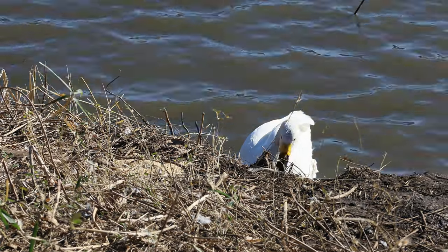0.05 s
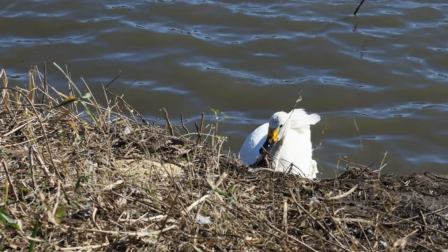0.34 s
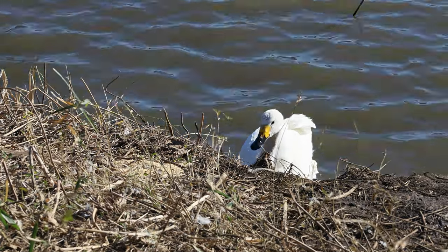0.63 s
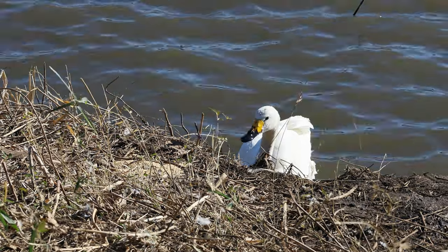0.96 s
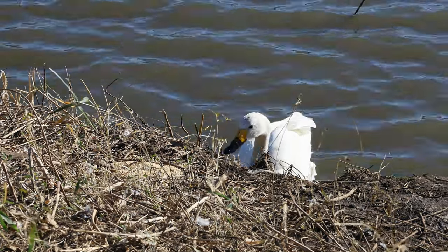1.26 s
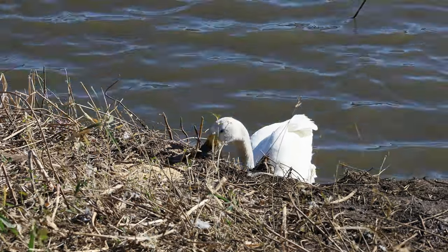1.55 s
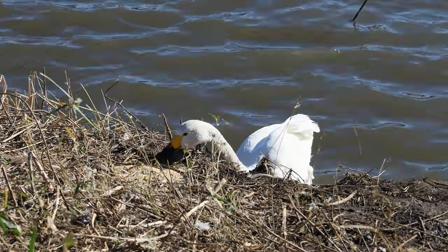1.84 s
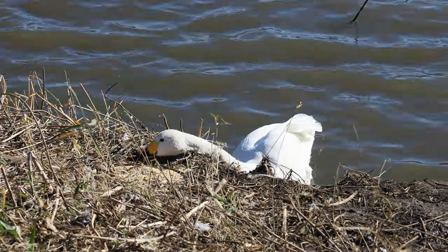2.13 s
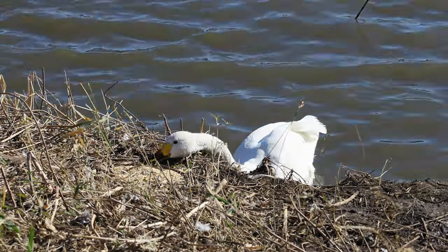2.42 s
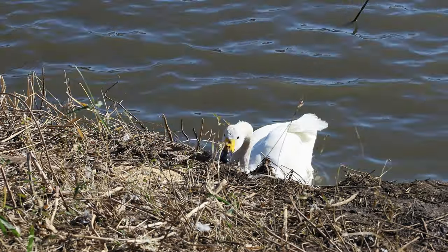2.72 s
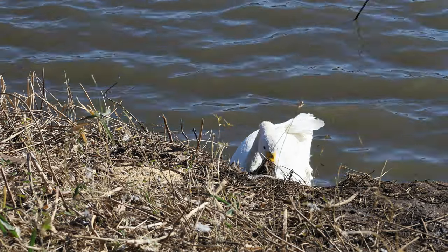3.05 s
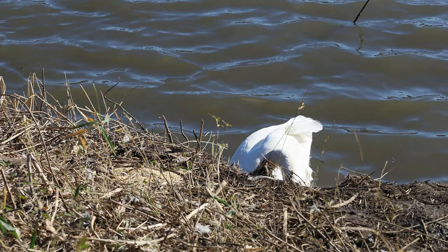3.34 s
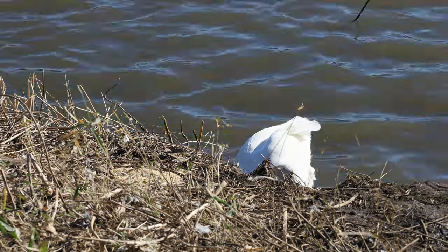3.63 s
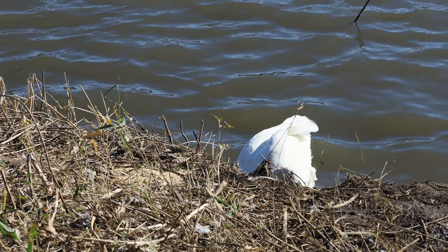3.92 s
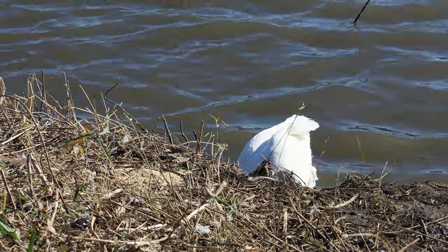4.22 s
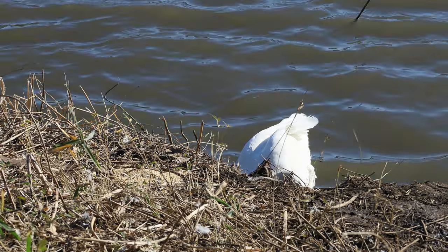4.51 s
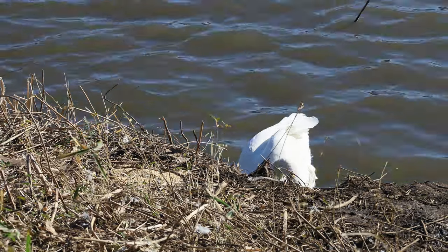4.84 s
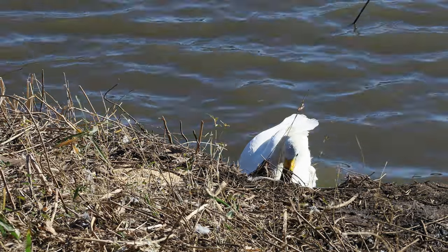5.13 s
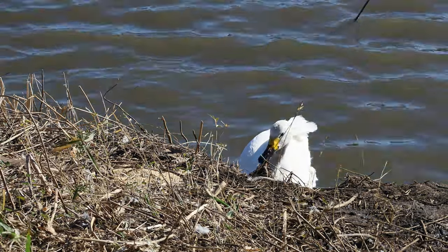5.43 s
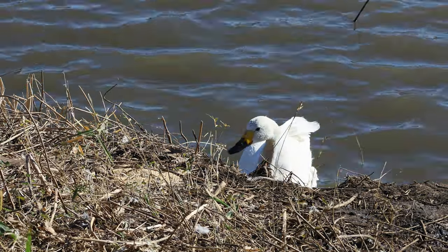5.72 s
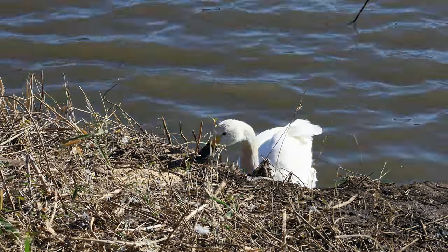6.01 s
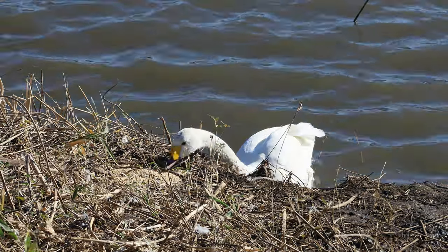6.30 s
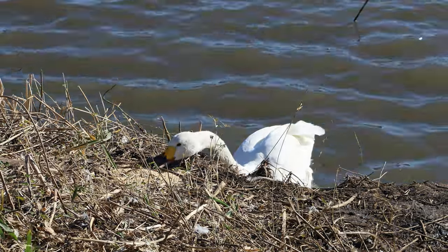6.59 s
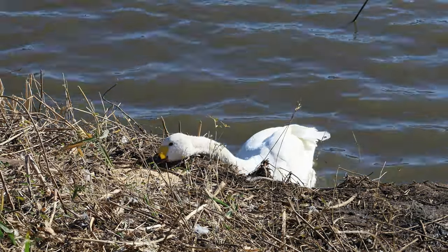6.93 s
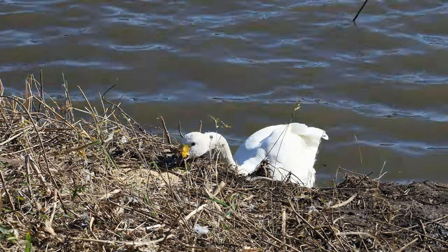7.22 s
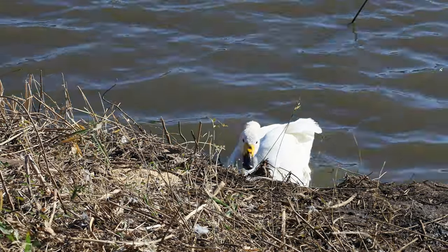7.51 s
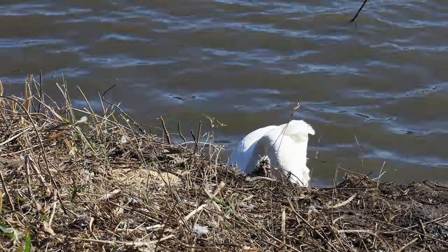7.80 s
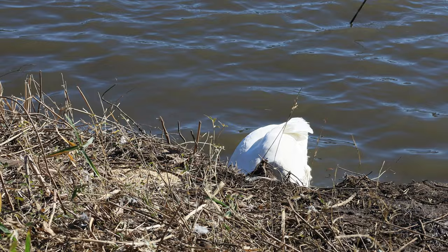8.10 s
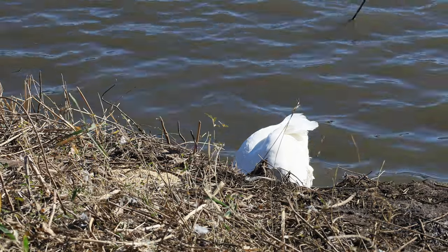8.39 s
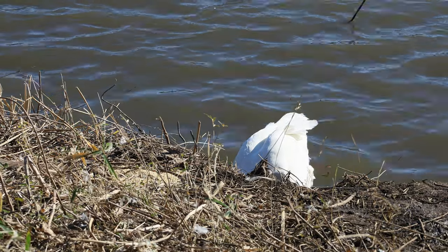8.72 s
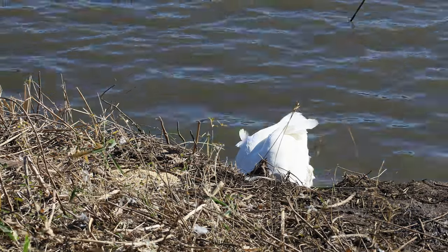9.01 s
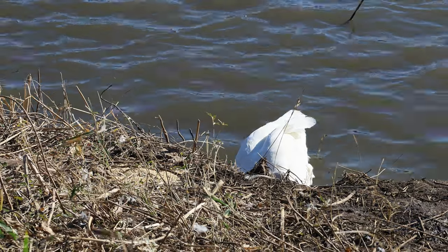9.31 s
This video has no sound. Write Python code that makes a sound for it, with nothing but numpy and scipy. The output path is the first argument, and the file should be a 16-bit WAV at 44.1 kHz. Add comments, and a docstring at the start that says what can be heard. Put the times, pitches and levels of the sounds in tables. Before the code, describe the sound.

A flock of swans calls throughout, for about nine seconds, on an open pond. Short arched honks, higher bugles and clear whoops overlap at several calls a second, with a light echo from the banks. Behind them a distant flock keeps up a softer chatter of honks and higher yelps. A few very brief reedy grunts are mixed in, with faint hoarse cries near 1.7 seconds and thin squeals at the start and around 3 to 4 seconds. The strongest calls come at about 0.6, 6.1, 8 and 8.9 seconds. Dry reeds rustle faintly, with scattered small snaps, the clearest near 8.8 seconds. Two tiny, barely audible splashes fizz at about 2.5 and 9 seconds. Low wind rumble on the microphone is slight at first, rises by 3 seconds and is strongest from 7 seconds on, staying beneath the calls.

```python
"""Whooper swans on a breezy pond

A flock calls in overlapping honks, bugles and whoops: membranes in each syrinx vibrate, and the windpipe
and bill resonate. More swans call from far off, and the banks return a soft echo. Near by, dry reeds
rustle and snap and water splashes softly, while a freshening wind rumbles on the microphone."""
import sys
import numpy as np
from scipy import signal
from scipy.fft import rfft, irfft
from scipy.io import wavfile
from scipy.ndimage import uniform_filter1d

SR = 44100
rng = np.random.default_rng(int(sys.argv[2]) if len(sys.argv) > 2 else 0)


def unload_wav(signal):
    """Save mono or channel-first audio to the path in sys.argv[1] as 16-bit WAV at rate SR, clipped to [-1, 1]."""
    wavfile.write(
        sys.argv[1],
        SR,
        np.round(np.clip(np.atleast_2d(signal).T, -1, 1) * 32767).astype(np.int16),
    )


N = 412335

# Pitches and levels of calls are nominal, before call() shapes them; octave and ring are relative levels.
# arched honks and low hoots: t/s, length/s, crest f/Hz, level/dB, octave/dB, overtone slope/dB
HONKS = [(0, 0.45, 576.6, -41.5, -20, -5), (0.341, 0.17, 799, -30, -26.5, -9.5),
         (0.556, .18, 755, -30, -19, -4.5), (0.819, 0.22, 607, -36.5, -42, -20),
         (1.421, 0.28, 785, -38.5, -12.5, -13.5), (1.5, 0.18, 643, -37.5, -24, -5),
         (1.698, 0.21, 813, -38, -21, -5), (1.783, 0.17, 859, -35, -29, -3),
         (2.371, 0.21, 794, -34.5, -28, -7), (2.549, 0.23, 819, -31.5, -27, -8),
         (2.858, 0.13, 709, -28.5, -24, -7), (3.155, 0.2, 790.6, -30, -36, -2),
         (3.218, 0.3, 762, -33.5, -33, -3), (3.45, 0.61, 506, -49.5, -28, -13),
         (3.737, 0.14, 750, -42.5, -30, -14), (4.312, 0.16, 762, -31.5, -17, -7.5),
         (4.323, 0.15, 700, -39, -24, -1.5), (4.791, 0.13, 786, -31, -25, -5.5),
         (5.04, 0.43, 534, -44.5, -37, -13), (5.205, 0.23, 767, -34, -21.5, -7),
         (5.318, 0.21, 801, -31.5, -36, 0), (5.578, 0.15, 748, -34, -21.5, -3.5),
         (6.217, 0.061, 510, -33.5, -26, -16), (6.269, 0.13, 686, -38, -26, -16),
         (6.734, 0.25, 784, -29, -28, -5.5), (6.991, 0.08, 674, -39, -39, -16),
         (7.184, 0.14, 769.4, -31, -20, -25), (7.634, 0.32, 732, -40, -31, -12),
         (7.976, 0.23, 780.5, -28, -28, -7.5), (7.984, 0.21, 810, -33, -23, -24),
         (8.163, 0.18, 601, -38, -36, -15), (8.559, .15, 787, -32.5, -25, -16),
         (8.657, 0.24, 719, -35, -24, -19), (9.141, 0.19, 718, -38, -23, -16)]
# ringing honks: t/s, length/s, crest f/Hz, level/dB, octave/dB, overtone slope/dB, ring/dB
YODELS = [(0.168, 0.2, 899, -33.5, -22.5, -9, -37), (1.064, 0.14, 901, -29.5, -28, -3, -41.5),
          (5.094, 0.15, 893, -30, -27, -9, -52), (6.118, 0.12, 879, -25.5, -27, -17, -56),
          (7.832, .18, 900, -24, -29, -18, -33.5), (8.693, 0.18, 905, -27, -26.5, -5.5, -42)]
# calls that crest early and sag: t/s, length/s, crest f/Hz, level/dB, octave/dB
BUGLES = [(0.679, 0.1, 1005, -35, -25), (1.223, 0.17, 1051, -41.5, -15), (1.316, 0.19, 992, -30.5, -26.5),
          (2.311, 0.18, 988, -30, -23), (2.76, 0.18, 859, -32.5, -39), (3.865, 0.21, 794, -45.5, -8.5),
          (4.13, 0.16, 863, -41, -34), (4.533, .16, 959, -35.5, -38), (4.883, 0.17, 830, -39.5, -12),
          (5.336, 0.15, 1006, -33.5, -15.5), (5.84, 0.122, 835, -52.5, -4.5),
          (5.973, 0.16, 858, -31.5, -28), (6.478, 0.19, 977, -32.5, -20), (6.577, .18, 927, -35.5, -24),
          (7.098, 0.188, 844, -35, -16), (7.43, 0.2, 982, -29, -20.5), (7.79, 0.1, 1052, -33.5, -21),
          (8.18, 0.13, 1230, -42.5, -33), (8.45, 0.093, 1075, -36.5, -24), (8.533, 0.14, 933, -36.5, -26),
          (8.93, 0.14, 1057, -35, -20.5)]
# calls that flip up to a sharp crest and back: t/s, length/s, crest f/Hz, level/dB
WHOOPS = [(-.06, .17, 930, -28), (0.556, 0.16, 909, -25), (0.632, 0.22, 964, -30.5),
          (1.036, 0.2, 1024, -34.5), (1.322, 0.2, 953, -29), (2.2, .16, 904, -29),
          (2.565, 0.2, 893.5, -28.5), (2.891, 0.2, 874, -29.5), (3.582, .17, 916, -28.5),
          (4.518, 0.17, 1024, -28), (4.764, 0.24, 882, -35), (5.377, 0.17, 938, -28),
          (6.143, .15, 946, -29), (7.163, 0.175, 944, -30.5), (7.949, 0.13, 950, -25),
          (8.847, .14, 963, -25.5)]
# reedy low grunts: t/s, length/s, top f/Hz, fundamental level/dB, second harmonic level/dB
GRUNTS = [(0.175, 0.034, 796, -27, -62), (2.206, 0.033, 725, -44, -52), (2.582, .05, 794, -33, -53),
          (3.142, 0.0214, 665, -38.5, -46), (5.063, 0.051, 680, -35, -49), (6.083, 0.043, 660, -34, -46.5)]
# thin high calls: t/s, rise/s, fall/s, start f/Hz, crest f/Hz, end f/Hz, level/dB, octave/dB
SQUEALS = [(-.01, 0.12, 0.098, 1740, 2046, 1455, -45.5, -10.5),
           (2.792, 0.11, 0.013, 1158, 1157, 1170, -43, -22),
           (3.772, 0.051, 0.013, 1480, 1610, 1590, -52, -25),
           (3.936, 0.054, .012, 1108, 1210, 1205, -44, -26),
           (4.06, 0.057, 0.038, 1383, 1487, 1470, -46.5, -22),
           (3.772, 0.056, 0.013, 1470, 1610, 1590, -56, -24),
           (3.935, 0.058, .012, 1098, 1232, 1205, -43.5, -26)]
# hoarse falling calls: t/s, rise/s, fall/s, start f/Hz, crest f/Hz, end f/Hz, level/dB, octave/dB
SQUAWKS = [(1.715, 0.05, 0.11, 1347, 1630, 1380, -46, -13),
           (1.752, 0.0225, 0.092, 1350, 1387, 1240, -45, -17)]
# bouts in which the far birds yelp: start t/s, end t/s
YELP_BOUTS = [(0.2, 1.585), (2.5, 3.58), (3.8, 5.7), (8.3, 11.8)]
# stirring of the reeds: t/s, level/dB
REED_LEVELS = [(0, -64), (0.55, -65.5), (1.75, -60), (2.35, -60), (2.62, -56), (2.88, -58), (3.2, -57),
               (4.05, -58.5), (4.4, -63.5), (4.85, -58), (5.8, -62.5), (7.35, -60), (8.4, -59.5),
               (9.15, -55.5)]
# spectrum of the rustle: f/Hz, relative level/dB
REED_SPECTRUM = [(300, 6), (2000, 4.5), (4500, 3), (9000, 0), (13500, 0), (16000, -4)]
# dry stalks that snap: t/s, peak level/dB, centre f/Hz
STALK_SNAPS = [(0.183, -43, 6000), (0.358, -46.5, 5970), (0.955, -46, 10000), (2.403, -42, 12000),
               (2.575, -46, 11000), (2.7407, -40, 10500), (3.1847, -42, 9450), (3.204, -43, 8000),
               (3.6461, -43, 9000), (3.676, -43, 11100), (4.0482, -40, 11500), (6.4825, -48, 7950),
               (6.8647, -42.5, 8000), (7.2394, -45, 10100), (7.474, -43, 9050), (8.6697, -44, 11200),
               (8.83, -40, 11000), (8.848, -35.5, 3580), (9.0823, -44, 12000)]
# small splashes: t/s, length/s, level/dB
SPLASHES = [(2.55, .2, -61), (9.06, .22, -60)]
# wind on the microphone: t/s, level/dB
WIND_LEVELS = [(0, -64.5), (0.8, -58), (1.6, -54.5), (2.9, -43), (4.85, -43), (5.1, -38), (6.2, -43),
               (7.2, -38.5), (8.3, -36.5), (9.35, -37)]
# spectrum of the buffeting: f/Hz, relative level/dB
WIND_SPECTRUM = [(15, -5.5), (55, -0.5), (140, -5.5), (300, -16), (900, -27.5)]
# spectrum of the hush of open country: f/Hz, relative level/dB
AIR_SPECTRUM = [(30, -17), (330, -6), (1500, -14.5), (4000, -31.5)]

REST_HZ = 512  # pitch of the slack syrinx
SCOOP, SCOOP_S = 0.0442, 0.01676  # a call starts flat by this share and settles this fast
BREAK, BREAK_S = .022, .004  # largest share by which the voice breaks downward, and how fast
HOLD_HZ, HOLD_WIDTH_HZ = 688.6, 88.4  # the windpipe holds the pitch near here, then lets it leap
PIPE_SPACING_HZ, PIPE_RIPPLE_DB = 570, 2.6  # upper resonances of the windpipe
BILL_HZ, BILL_WIDTH_HZ, ROLLOFF_HZ = 2080, 560, 5500
RING_HZ, RING_WIDTH_HZ = 5130, 1060  # bright resonance of the bill
ATTACK_S, RELEASE_S, ONSET_EFFORT = 0.0092, 0.027, 0.54
WAVER, FLUTTER_DB = .006, 1.1  # unsteadiness of pitch (a share) and of level


def call(row, bend, pipe_hz=760, pipe_width_hz=330, rough=0.099, crack=0.057, jitter=.003,
         sag=1, hold=0, ring_db=-70):
    """Source and filter: the syrinx glides in pitch, and windpipe and bill resonate as it passes."""
    rise, fall, start_hz, crest_hz, end_hz, db, octave_db, slope_db = row
    t = np.arange(0, rise + fall, 1 / SR)
    n = len(t)
    u = np.interp(t, [0, rise, rise + fall], [1, 0, 1])  # distance from the crest
    rising = (start_hz - crest_hz) * bend(u)
    falling = (end_hz - crest_hz) * bend(u ** sag)  # sag under 1 leaves the crest early
    hz = crest_hz + np.where(t < rise, rising, falling)
    # somewhere on the way down the voice breaks and drops a small step
    where, step = rng.random(2)
    broken = (1 + np.tanh((t - rise - fall * (1 + where) / 2) / BREAK_S)) / 2
    hz *= 1 - BREAK * step * broken
    hz *= 1 - SCOOP * np.exp(-t / SCOOP_S)  # it scoops up to pitch as the air starts to flow
    hz -= hold * (hz - HOLD_HZ) * np.exp(-((hz - HOLD_HZ) / HOLD_WIDTH_HZ) ** 2)
    # the membranes never hold their pitch exactly, least of all on the flanks
    hz *= 1 + WAVER * (.5 + u) * wander(35.5, n)
    hz *= 1 + jitter * (.5 + u) * wander(159.6, n)
    phase = 2 * np.pi * np.cumsum(hz) / SR
    pipe = resonance(hz, pipe_hz, pipe_width_hz)
    voice = pipe / pipe.max() * (1 - 0.054 * u ** 2) * np.sin(phase)
    # overtones bloom at the onset and at the crest, where the bird pushes hardest
    onset = np.exp(-t / 0.025)
    effort = np.exp(-1.2 * u ** 2) + ONSET_EFFORT * onset
    # each flares as it crosses the upper resonances of the windpipe, which shift as the neck moves
    spacing_hz = PIPE_SPACING_HZ * (1 + .05 * wander(6, n))
    for k in range(2, 9):
        bill = (1 + .5 * resonance(k * hz, BILL_HZ, BILL_WIDTH_HZ)) / (1 + (k * hz / ROLLOFF_HZ) ** 4)
        ring = undb(ring_db) * resonance(k * hz, RING_HZ, RING_WIDTH_HZ)
        partial_db = octave_db + slope_db * (k - 2) ** 0.7
        bloom = effort ** (k / 2 + .5 * (k > 3))
        flare = undb(PIPE_RIPPLE_DB * np.cos(2 * np.pi * k * hz / spacing_hz) + 2 * wander(35.4, n))
        voice += (undb(partial_db) * bill + ring) * bloom * flare * np.sin(k * phase)
    strain = max(1, crest_hz / 1000) ** 2  # high calls are hoarser
    level = undb(db + FLUTTER_DB * wander(45.6, n))
    grain = 1 + (rough * strain + crack * onset) * wander(400, n)
    envelope = np.clip(t / ATTACK_S, 0, 1) * np.clip((t[-1] - t) / RELEASE_S, 0, 1)
    return voice * level * grain * envelope


def glide(length, crest_hz, rise_share, start_tension, end_tension):
    """Tension sets pitch (0 at rest, 1 at the crest): gives rise/s, fall/s and start, crest, end f/Hz."""
    rise = length * rise_share
    reach = crest_hz - REST_HZ
    return rise, length - rise, REST_HZ + start_tension * reach, crest_hz, REST_HZ + end_tension * reach


def arch(u):
    """Power-law contour: the pitch drop at distance u (0-1) from a round crest."""
    return u ** 2.2


def flip(u):
    """Squared-sine contour: the pitch drop from a narrow crest between two shoulders."""
    return (np.sin(1.31 * u) / np.sin(1.31)) ** 2


def honks():
    """Tension in the syrinx rises and relaxes: round arches that end lower than they began."""
    out = np.zeros(N)
    for s, length, crest_hz, *levels in HONKS:
        pitch = glide(length, crest_hz, rise_share=0.4195, start_tension=.66, end_tension=0.471)
        add(out, s, call((*pitch, *levels), arch))
    return out


def yodels():
    """Resonance swells these clear honks in the windpipe and rings in the bill at the crest."""
    out = np.zeros(N)
    for s, length, crest_hz, *levels, ring_db in YODELS:
        pitch = glide(length, crest_hz, rise_share=.45, start_tension=.64, end_tension=0.49)
        add(out, s, call((*pitch, *levels), arch, pipe_width_hz=610, hold=0.45, ring_db=ring_db))
    return out


def bugles(slope_db=-10.5):
    """Taut membranes vibrate fast: these calls start high, crest early and sink slowly."""
    out = np.zeros(N)
    for s, length, crest_hz, db, octave_db in BUGLES:
        pitch = glide(length, crest_hz, rise_share=0.293, start_tension=.87, end_tension=.76)
        add(out, s, call((*pitch, db, octave_db, slope_db), arch, sag=0.638))
    return out


def whoops(octave_db=-36, slope_db=-11):
    """An almost pure tone sweeps through a narrow windpipe resonance on the way up and down."""
    out = np.zeros(N)
    for s, length, crest_hz, db in WHOOPS:
        pitch = glide(length, crest_hz, rise_share=.51, start_tension=0.3276, end_tension=0.085)
        whoop = call((*pitch, db, octave_db, slope_db), flip, pipe_hz=730, pipe_width_hz=100, hold=0.5)
        add(out, s, whoop)
    return out


def grunts(climb=0.0926, rough=0.1, slope_db=-5):
    """Slack membranes vibrate slowly: a short buzz of three harmonics that climbs in pitch."""
    out = np.zeros(N)
    for s, length, top_hz, low_db, second_db in GRUNTS:
        n = int(length * SR)
        hz = top_hz * (1 - climb * (1 - np.linspace(0, 1, n) ** 2))
        phase = 2 * np.pi * np.cumsum(hz) / SR
        levels = low_db, second_db, second_db + slope_db
        buzz = sum(undb(db) * np.sin(k * phase) for k, db in enumerate(levels, 1))
        add(out, s, buzz * (1 + rough * wander(400, n)) * signal.windows.tukey(n, .5))
    return out


def squeals(slope_db=-14):
    """Thin voices pitched above the main windpipe resonance: some level off, others tip over and plunge."""
    out = np.zeros(N)
    for s, *row in SQUEALS:
        add(out, s, call((*row, slope_db), arch, pipe_width_hz=900))
    return out


def squawks(slope_db=-20):
    """Random modulation of frequency and amplitude makes these falling cries hoarse."""
    out = np.zeros(N)
    for s, *row in SQUAWKS:
        add(out, s, call((*row, slope_db), arch, pipe_width_hz=770, rough=.22, jitter=.008))
    return out


def far_flock(spans, count, pitch_hz, half_s, db, octave_db, slope_db=-11, sweep=.16):
    """Superposition of independent voices far out on the water, count calls in each span."""
    out = np.zeros(N)
    for start, end in spans:
        for i, (when, length, lean, pitch, size) in enumerate(rng.uniform(-1, 1, (count, 5))):
            crest_s = start + (i + .5 + when) / count * (end - start)
            half = half_s * 2 ** (.5 * length)
            rise, fall = half * (1 + lean / 2), half * (1 - lean / 2)
            hz = pitch_hz * 1.28 ** pitch
            start_hz, end_hz = hz * (1 - sweep * np.array([rise, fall]) / half)
            row = rise, fall, start_hz, hz, end_hz, db + 3 * size, octave_db, slope_db
            add(out, crest_s - rise, call(row, arch))
    return out


def banks(x, echo_db, t60=1.0):
    """Scattering from banks and trees adds an exponentially decaying echo to the direct sound."""
    t = np.arange(SR) / SR
    tail = rng.standard_normal(SR) * undb(-60 * t / t60) * (1 - np.exp(-t / 0.01))
    return x + undb(echo_db) * signal.fftconvolve(x, tail / np.linalg.norm(tail))[:N]


def reeds(ticks_per_s=1100, crackle_db=-4, flicker_db=1.0):
    """Friction between dry blades makes a fine hiss full of ticks."""
    stir = rng.standard_normal(N) + undb(crackle_db) * ticks(ticks_per_s)
    return colour(stir, REED_SPECTRUM) * undb(curve(REED_LEVELS) + flicker_db * wander(55, N))


def snaps(decay_s=.0036):
    """Brittle fracture: a stalk cracks in a short, bright burst of noise."""
    out, t = np.zeros(N), np.arange(SR // 20) / SR
    for s, peak_db, hz in STALK_SNAPS:
        stalk = signal.butter(1, [hz / 1.4, hz * 1.4], "band", fs=SR, output="sos")
        burst = signal.sosfilt(stalk, rng.standard_normal(len(t)) * np.exp(-t / decay_s))
        add(out, s, undb(peak_db) * burst / np.abs(burst).max())
    return out


def splashes(drops_per_s=900, spray_hz=12500):
    """Impacts of fine droplets at the shore sum to a fizz that swells and dies away."""
    swell = np.zeros(N)
    for s, length, db in SPLASHES:
        add(swell, s, undb(db) * signal.windows.tukey(int(length * SR)))
    return swell * colour(ticks(drops_per_s), [(spray_hz / 2, -10), (spray_hz, 0)])


def wind(gust_db=1.0, air_db=-54):
    """Turbulence: eddies buffet the microphone over the steady hush of open country."""
    rumble = colour(rng.standard_normal(N), WIND_SPECTRUM)
    gusts = undb(curve(WIND_LEVELS) + gust_db * wander(10, N))
    return rumble * gusts + undb(air_db) * colour(rng.standard_normal(N), AIR_SPECTRUM)


def ticks(per_s, spread_db=3.2, bunch_db=2.2):
    """Shot noise: bunches of random impulses of very unequal size, at rms 1."""
    impulses = (rng.random(N) < per_s / SR) * rng.standard_normal(N)
    size_db = spread_db * np.minimum(rng.exponential(size=N), 4)
    return unit(impulses * undb(size_db + bunch_db * wander(50, N)))


def resonance(hz, centre_hz, half_width_hz):
    """Lorentzian response of a resonator, 1 at its centre."""
    return 1 / (1 + ((hz - centre_hz) / half_width_hz) ** 2)


def colour(x, points):
    """Spectral shaping: filter x by (f/Hz, level/dB) points and scale to rms 1."""
    hz, db = np.transpose(points)
    f = np.arange(1, N // 2 + 2) * SR / N
    skirts = np.minimum(1, hz[-1] / f) ** 2 * np.minimum(1, f / hz[0])
    gain = undb(np.interp(np.log(f), np.log(hz), db))
    return unit(irfft(rfft(x) * skirts * gain, N))


def wander(rate_hz, n):
    """A moving average of random steps: smooth drift with a spread of order 1."""
    k = max(int(SR / rate_hz), 2)
    return 1.746 * uniform_filter1d(np.repeat(rng.standard_normal(n // k + 1), k), k)[:n]


def curve(rows):
    """Linear interpolation between rows of (t/s, value)."""
    return np.interp(np.arange(N) / SR, *np.transpose(rows))


def add(out, start_s, x):
    """Superposition: mix x into out from start_s on."""
    i = int(start_s * SR)
    a, b = max(i, 0), min(i + len(x), len(out))
    if b > a:
        out[a:b] += x[a - i:b - i]


def undb(db):
    """Decibels to amplitude ratio."""
    return 10 ** (np.asarray(db) / 20)


def unit(x):
    """Normalisation to rms 1."""
    return x / np.sqrt(np.mean(x ** 2))


def scene():
    """Swans and shore sounds add linearly; the far birds carry a larger share of echo than the near."""
    near = honks() + yodels() + grunts() + bugles() + squeals() + squawks() + whoops()
    far = far_flock([(0.00026, N / SR)], count=120, pitch_hz=704.2, half_s=.09, db=-46, octave_db=-16.5)
    yelps = far_flock(YELP_BOUTS, count=11, pitch_hz=1398, half_s=0.055, db=-51.5,
                      octave_db=-19.5, slope_db=-8)
    shore = reeds() + snaps() + splashes() + wind()
    return (banks(near, echo_db=-16) + banks(far + yelps, echo_db=-6) + shore)[None]


def record(dry):
    """Band limiting: a steep elliptic low-pass removes the highest treble."""
    cutoff_hz = 15700
    return signal.sosfilt(signal.ellip(10, .2, 70, cutoff_hz, fs=SR, output="sos"), dry)


dry = scene()
out = record(dry)
unload_wav(out)
```